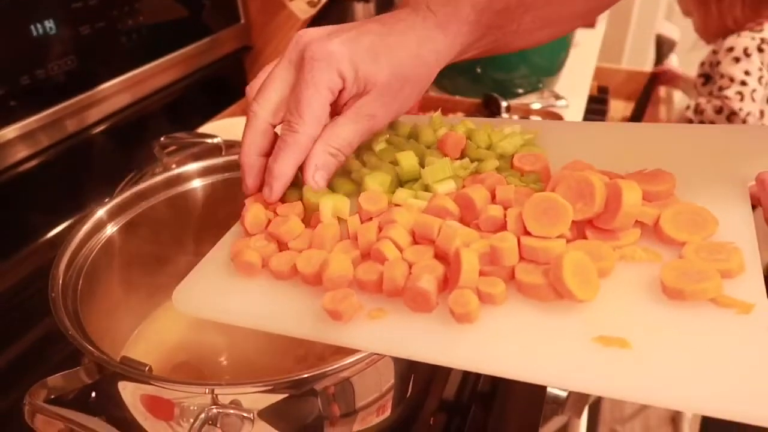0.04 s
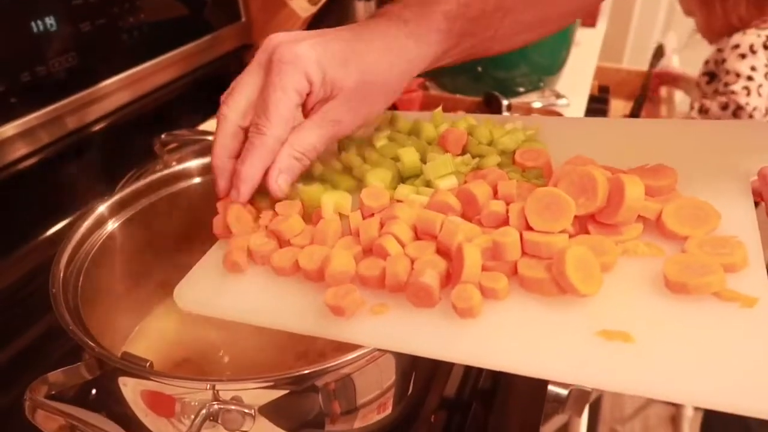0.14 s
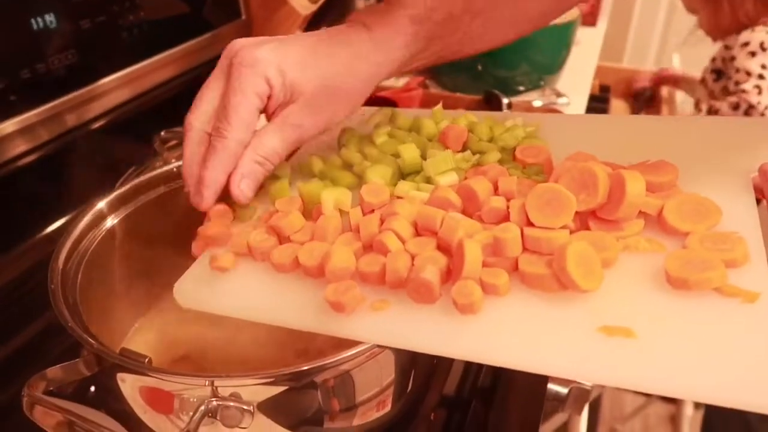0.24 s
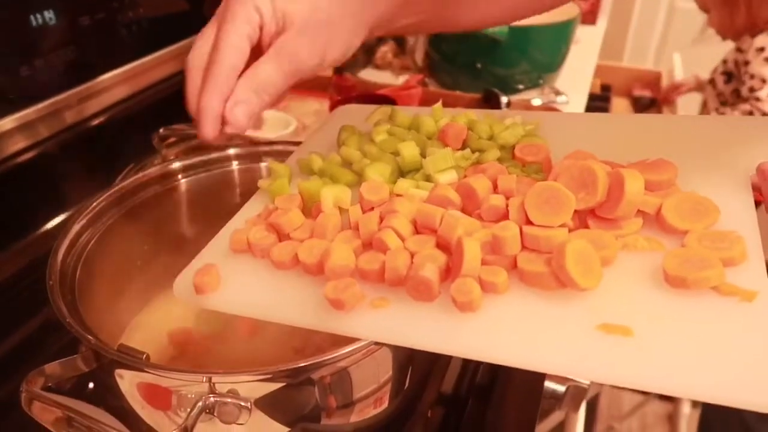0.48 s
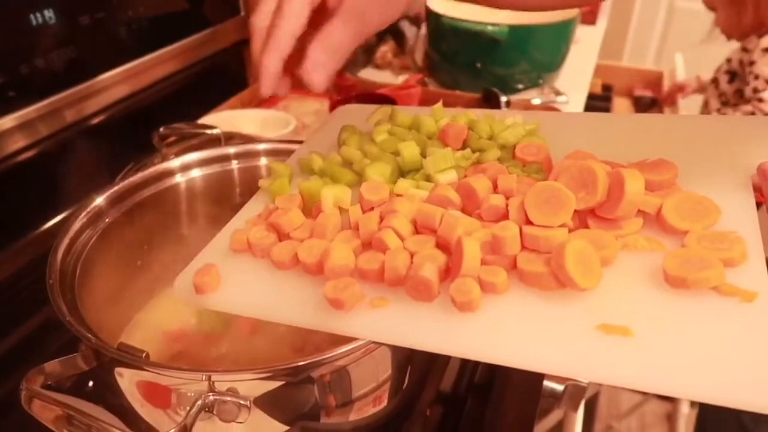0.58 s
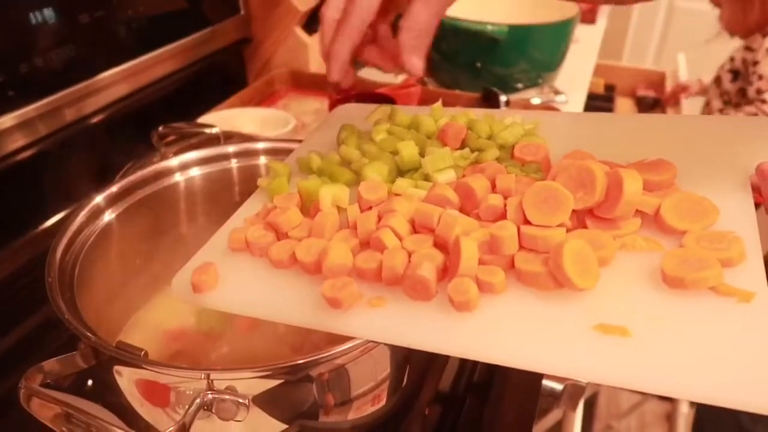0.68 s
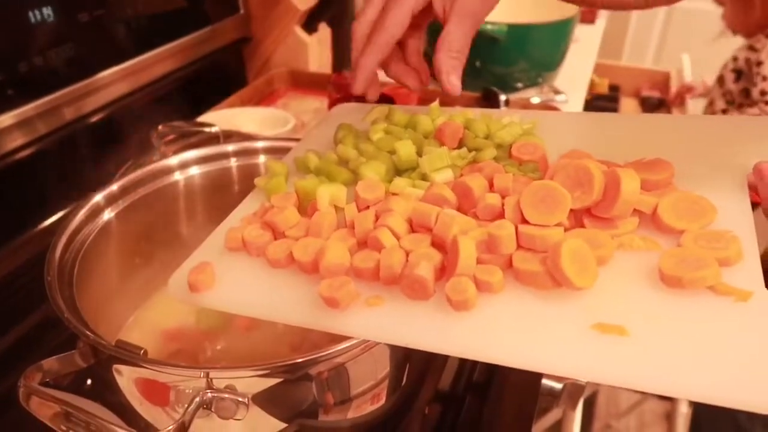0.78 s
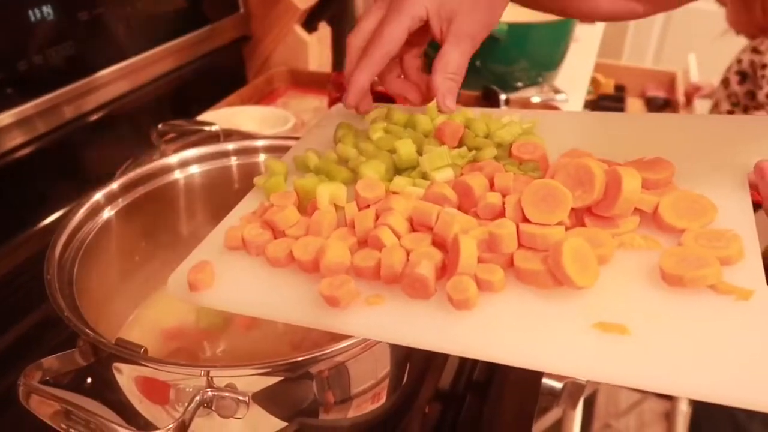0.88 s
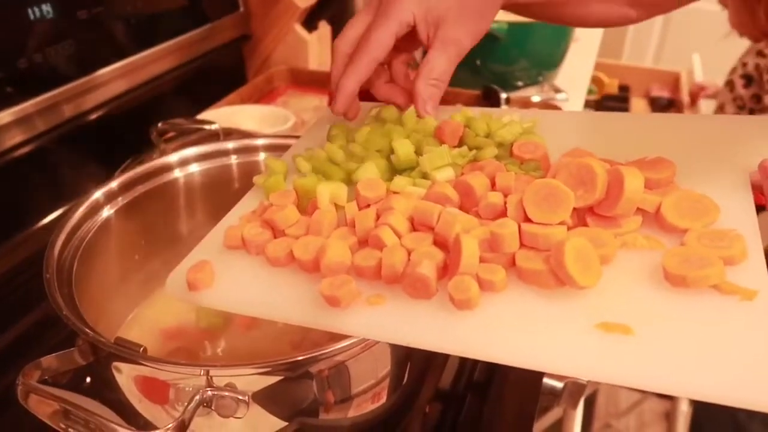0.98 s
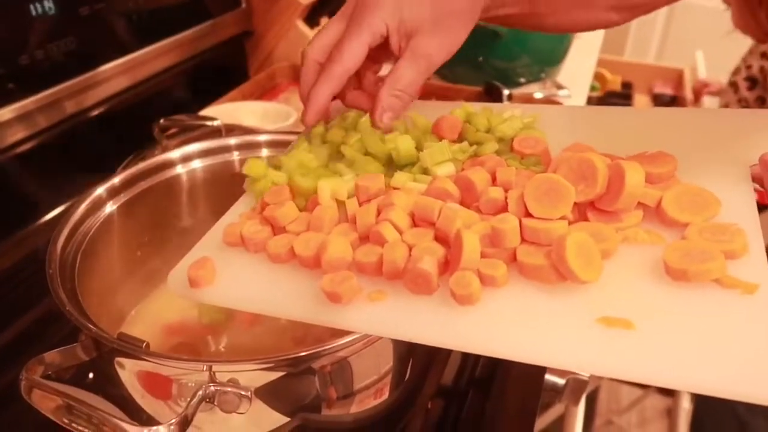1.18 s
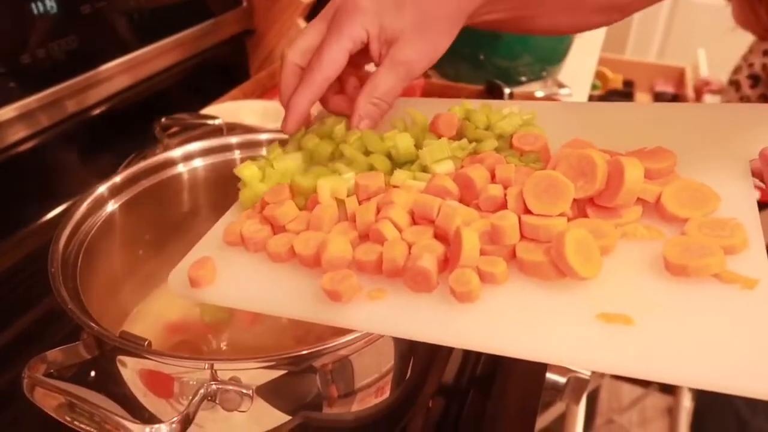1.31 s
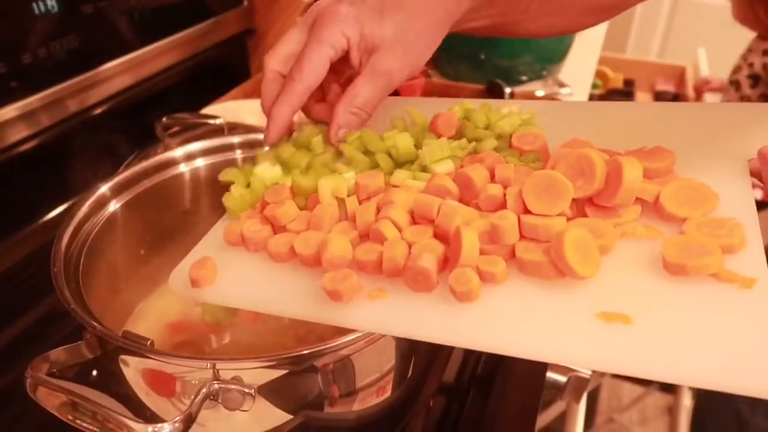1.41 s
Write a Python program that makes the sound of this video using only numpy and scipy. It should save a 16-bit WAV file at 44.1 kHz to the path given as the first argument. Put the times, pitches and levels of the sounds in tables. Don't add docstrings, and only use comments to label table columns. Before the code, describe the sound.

A plastic cutting board knocks hard on a steel pot rim, over soft simmering and faint hum

```python
import sys
import numpy as np
from scipy import signal
from scipy.fft import rfft, irfft, next_fast_len
from scipy.io import wavfile
from scipy.ndimage import map_coordinates

SR = 44100
rng = np.random.default_rng(int(sys.argv[2]) if len(sys.argv) > 2 else 0)


def master_out(mix):
    frames = np.transpose(np.atleast_2d(mix))
    ceiling = np.clip(frames, -1, 1)
    pcm = np.round(ceiling * 32767).astype(np.int16)
    wavfile.write(sys.argv[1], SR, pcm)


def elevation(decibels):
    levels = np.asarray(decibels, float)
    return 10 ** (levels / 20)


N = 63945
LEAD = 4000
BLOW_S = .249

# frequency in Hz, density in dB per Hz.
AIR_COLOUR = [(18, -30), (35, -11), (200, -5.5), (600, -12.5), (1400, -18), (3000, -25), (9000, -38.5),
              (16000, -54.5)]
# frequency in Hz, level in dB.
HUM_PARTIALS = [(60.8, -82), (121.6, -52.5)]
# frequency in Hz, left-right correlation.
PORT_LIKENESS = [(60, 0.99), (150, 0.93), (380, 0.88), (950, 0.87), (2380, 0.83), (5980, -0.02),
                 (15000, 0.054)]
# frequency in Hz, bandwidth in Hz, level in dB.
POT_RESONANCES = [(117, 40, -8), (215, 160, -1.5), (515, 120, 6.5), (660, 270, -9.5), (1087, 37, 5.5),
                  (1119, 49, 3.5), (1640, 70, -11.5), (2236, 34, -2.5)]
# frequency in Hz, t60 in seconds.
ROOM_T60 = [(100, .45), (400, 0.69), (1500, 0.63), (4000, 0.59), (8000, 0.5), (14000, 0.34)]
# frequency in Hz, level in dB.
ROOM_COLOUR = [(100, -0.5), (280, 0.5), (800, 2), (1500, -2.5), (3500, 3), (5500, -2.5), (8000, -12.5),
               (10000, -3.5)]
# frequency in Hz, left-right correlation.
ROOM_LIKENESS = [(200, 1), (700, 1), (1500, 1), (2500, 1), (4400, 1), (8000, 1), (15000, -.4)]
# start in seconds, level in dB, pitch in Hz.
DROPLETS = [
    (.403, -45, 10500),
    (.585, -41, 5200),
    (.769, -40, 5400),
    (.834, -43, 5000),
    (.908, -37, 4800),
    (.91, -39, 2800),
    (1.008, -42, 7800),
]
# start in
# seconds, level in dB, pitch in Hz, t60 in seconds.
SOFT_SOUNDS = [(-.002, -37.5, 806, 0.064), (.002, -45, 3530, 0.045), (0.013, -45.5, 2900, 0.02),
               (.003, -27.5, 1025, 0.05), (0.024, -31.5, 1090, 0.034), (0.059, -34, 259, 0.043),
               (.06, -36, 113.5, 0.13), (.138, -46.5, 463, 0.02), (.198, -36, 427, 0.074),
               (0.198, -35.5, 1000, 0.032), (0.179, -56, 4300, 0.074), (0.26, -23.5, 103.7, 0.14),
               (0.268, -33, 281, 0.9), (0.89, -40.5, 1040, 0.048), (0.913, -44, 1640, 0.045),
               (0.976, -43, 1000, .05), (1.03, -37.5, 520, 0.1), (1.04, -56, 1080, .03),
               (1.111, -44, 1110, .05), (1.115, -48, 1750, .05), (1.254, -39, 1060, 0.063),
               (1.266, -43, 1090, 0.017), (1.265, -39, 480, .05), (1.305, -47, 1610, .05),
               (1.329, -40.5, 466, 0.066), (1.344, -42.5, 1700, 0.028), (1.408, -31.5, 480, 0.05),
               (1.433, -29, 470, 0.034), (1.44, -42, 1060, 0.027)]
# time in seconds, level in dB.
SLIDE_LEVEL = [
    (.17, -65),
    (0.216, -58),
    (.228, -50),
    (.238, -57),
    (0.244, -21.5),
    (0.2505, -25.5),
    (0.251, -90),
]
# frequency in Hz, level in dB.
FRICTION_COLOUR = [(200, -28), (700, 0), (2000, -17), (4500, -6), (9000, -17), (14000, -29), (16500, -59)]
# frequency in Hz, level in dB, t60 in seconds.
RIM_PARTIALS = [(2750, -42, .2), (4700, -38, .5), (5880, -45, .4), (7600, -48, .45)]
# start in seconds, board level in dB, crack level in dB.
CONTACTS = [
    (-.03, -45, -32),
    (-.004, -24, -22),
    (0.2443, -20.5, -34),
    (0.249, 3, 6.5),
    (0.2525, -7, -39),
    (.255, -3.5, -19),
    (0.2574, -6.5, -29),
]
# frequency in Hz, level in dB, t60 in seconds.
BOARD_MODES = [(345, -49, .03), (480, -30, .03), (722, 11, 0.018), (870, 14, 0.0073), (936, 1, .025),
               (1088, 3, 0.053), (1270, 1.5, 0.053), (1455, 13, 0.011), (1576, 3, 0.066), (1750, 1, 0.036),
               (2160, -11, .02), (2550, -17.5, .03), (3740, -11, .02), (4300, -18, 0.033)]
# frequency in Hz, level in dB.
CRACK_COLOUR = [(1500, -7), (3500, -1), (5000, -2.5), (7000, -0.5), (8400, -4), (9600, -34), (12500, -21),
                (16000, -38)]


def unit(x):
    return x / np.sqrt(np.mean(x ** 2) + 1e-20)


def along(points, hz):
    f, v = np.transpose(points)
    return np.interp(np.log(hz + 1), np.log(f + 1), v)


def wobble(rate):
    knots = rng.standard_normal(int(N * rate / SR) + 4)
    return map_coordinates(knots, [np.arange(N) * rate / SR])


def filtered(x, response):
    n = x.shape[-1]
    m = next_fast_len(n + SR // 2)
    return irfft(rfft(x, m) * response(np.fft.rfftfreq(m, 1 / SR)), m)[..., :n]


def peak(hz, share):
    return lambda f: 1j * f * share * hz / (hz * hz - f * f + 1j * f * share * hz)


def spread(pair, alike):
    def mid_side(hz):
        angle = np.arccos(np.clip(along(alike, hz), -1, 1)) / 2
        return np.array([np.cos(angle), np.sin(angle)])

    mid, side = filtered(pair, mid_side)
    return np.array([mid + side, mid - side])


def add(track, s, sound):
    part = track[round(s * SR) + LEAD:][:len(sound)]
    part += sound[:len(part)]


def room(x):
    level_db, build_up_s = -8.5, 0.0026
    hz, t, z = signal.stft(rng.standard_normal((2, SR * 3 // 4)), SR, nperseg=256)
    decay_db = -60 * t / along(ROOM_T60, hz)[:, None]
    z = z * elevation(along(ROOM_COLOUR, hz)[:, None] + decay_db)
    tail = spread(signal.istft(z, SR, nperseg=256)[1], ROOM_LIKENESS)
    tail *= 1 - np.exp(-np.arange(tail.shape[1]) / SR / build_up_s)
    tail = tail / np.linalg.norm(tail[0])
    return elevation(level_db) * signal.fftconvolve(x[None], tail, axes=1)[:, :len(x)]


def air():
    t = np.arange(N) / SR
    noise = filtered(rng.standard_normal((2, N)), lambda hz: elevation(along(AIR_COLOUR, hz)))
    hiss = unit(spread(noise, PORT_LIKENESS))
    hum = sum(elevation(db + 2.5 * wobble(8)) * np.sin(2 * np.pi * hz * t) for hz, db in HUM_PARTIALS)
    return elevation(-45.5 + .8 * wobble(14)) * hiss + hum


def cavity(f):
    total = 0
    for k, (centre, width, db) in enumerate(POT_RESONANCES):
        sign = (-1) ** (k - (centre > 1100))  # alternates, but the close pair near 1100 Hz agrees
        total = total + sign * elevation(db) * 1j * f * width / (centre * centre - f * f + 1j * f * width)
    return total


def simmer():
    level_db, lumps_per_s, lump_db = -46, 640, 4.5
    happens = rng.random((2, N)) < lumps_per_s / SR
    size = elevation(lump_db * rng.exponential(size=(2, N)) * 0.21)
    lumps = happens * rng.standard_normal((2, N)) * size
    swell_db = 2.2 * wobble(29.83) + .7 * wobble(4.5)
    drive = (unit(lumps) + 0.55 * rng.standard_normal((2, N))) * elevation(swell_db)
    pot = filtered(drive, lambda f: cavity(f) / (1 + 1j * f / 3000))
    return elevation(level_db) * unit(spread(pot, PORT_LIKENESS))


def ticks():
    x, t = np.zeros((2, N + LEAD)), np.arange(SR // 50) / SR
    for s, db, hz in DROPLETS:
        for side in x:
            burst = rng.standard_normal(len(t)) * elevation(-60 * t / .015)
            add(side, s, elevation(db) * filtered(burst, lambda f: peak(hz, .55)(f) ** 3))
    return x[:, LEAD:]


def nudges():
    x, t = np.zeros(N + LEAD), np.arange(SR // 8) / SR
    for s, db, hz, t60 in SOFT_SOUNDS:
        puff = unit(filtered(rng.standard_normal(len(t)), lambda f: peak(hz, .3)(f) ** 2))
        early_power = np.mean(puff[:round(t60 * SR / 4)] ** 2)
        puff = puff / np.sqrt(.5 + .5 * early_power)
        swell = 1 - np.exp(-t / 0.0013)
        add(x, s, elevation(db + 5.5 - 60 * t / t60) * swell * puff)
    return (x + 0.88 * room(x))[:, LEAD:]


def slide():
    s, db = np.transpose(SLIDE_LEVEL)
    level_db = np.interp(np.arange(N) / SR, s, db, left=-120, right=-120)
    rub = filtered(rng.standard_normal((2, N)), lambda hz: elevation(along(FRICTION_COLOUR, hz)))
    return unit(spread(rub, [(500, .8), (3000, 0.85), (8000, 0.33)])) * elevation(level_db)


def rim():
    t = np.clip(np.arange(N) / SR - BLOW_S, 0, None)
    total = 0
    for hz, db, t60 in RIM_PARTIALS:
        level = elevation(db + 3 * np.tanh(wobble(28)) - 60 * t / t60)
        total = total + level * np.sin(2 * np.pi * hz * t + 0.32 * wobble(60)) * (t > 0)
    return total


def ring(t):
    total = 0
    for hz, db, t60 in BOARD_MODES:
        level_db = db - 10 + rng.normal(0, 1.5)
        total = total + elevation(level_db - 60 * t / t60) * np.sin(2 * np.pi * hz * t)
    return total


def crack_response(hz):
    colour_db = along([(300, -35.5), *CRACK_COLOUR], hz)
    side_db = along([(2000, -22), (5000, -18.5), (10000, -7)], hz)
    return np.array([elevation(colour_db), 1j * elevation(colour_db + side_db)])


def knock():
    contact_s, radiate_t60, crack_t60, board_low_hz = 0.00017, 0.0094, .0045, 249
    snap = 3.34
    body, feed = np.zeros(N + LEAD), np.zeros(N + LEAD)
    crack, t = np.zeros((2, N + LEAD)), np.arange(SR // 8) / SR
    for s, db, crack_db in CONTACTS:
        blow = elevation(db) * ring(t) * (1 - np.exp(-t / contact_s))
        add(body, s, blow)
        onset = 1.66 * rng.choice([-1, 1]) * blow * elevation(-60 * t / radiate_t60)
        add(feed, s + .004 * rng.random(), onset)
        rattle = 0.13 * rng.standard_normal((2, len(t))) * elevation(-60 * t / crack_t60)
        rattle[0, 0] = -snap
        for track, sound in zip(crack, rattle):
            add(track, s - .0001, elevation(crack_db) * sound)
    body, feed = filtered(np.array([body, feed]), lambda hz: (1j * hz / (board_low_hz + 1j * hz)) ** 2)
    mid, side = filtered(crack[0] + 0.54 * crack[1], crack_response)
    crack = np.array([mid + side, mid - side])
    return (body + crack + room(feed + crack.mean(axis=0)))[:, LEAD:]


def scene():
    return knock() + rim() + slide() + nudges() + ticks() + simmer() + air()


def band_limit(x):
    return signal.sosfilt(signal.butter(12, 16260, fs=SR, output="sos"), x)


def ports(hz):
    lag_s, sign = .00003, np.array([[1], [-1]])
    bass_db = along([(30, -2), (60, -2.5), (150, -0.34), (300, -0.32)], hz)
    return elevation(bass_db * sign) * np.exp(1j * np.pi * hz * lag_s * sign)


def record(dry):
    duck_db, attack_s, release_s = 13.5, 0.079, 1.33
    ceiling, hardness = .99, 5
    t = np.clip(np.arange(N) / SR - BLOW_S, 0, None)
    duck = (1 - np.exp(-t / attack_s)) * np.exp(-t / release_s)
    x = filtered(dry * elevation(-duck_db * duck), ports)
    x = x / (1 + np.abs(x / ceiling) ** hardness) ** (1 / hardness)
    return band_limit(x)


dry = scene()
out = record(dry)
master_out(out)
```